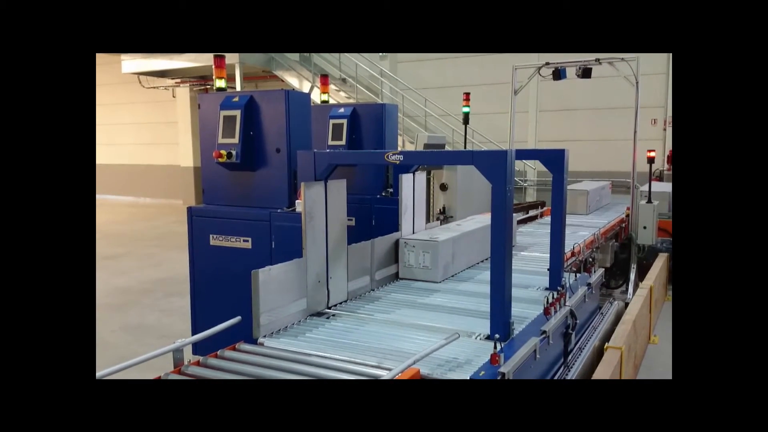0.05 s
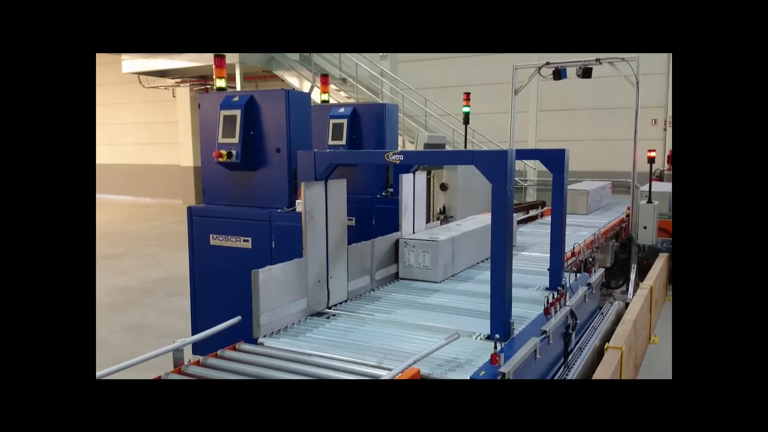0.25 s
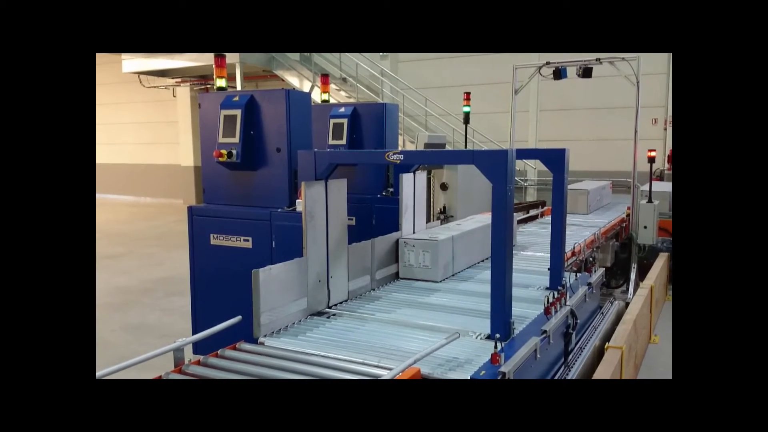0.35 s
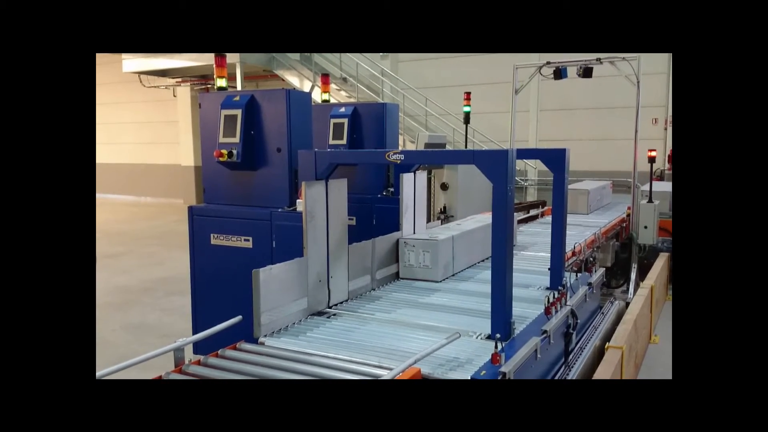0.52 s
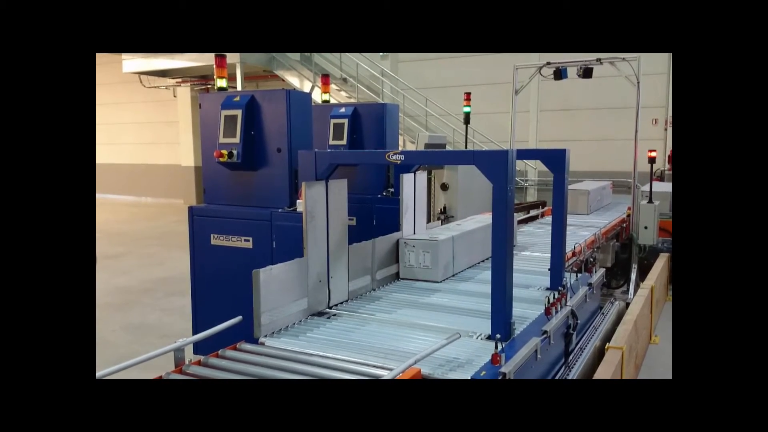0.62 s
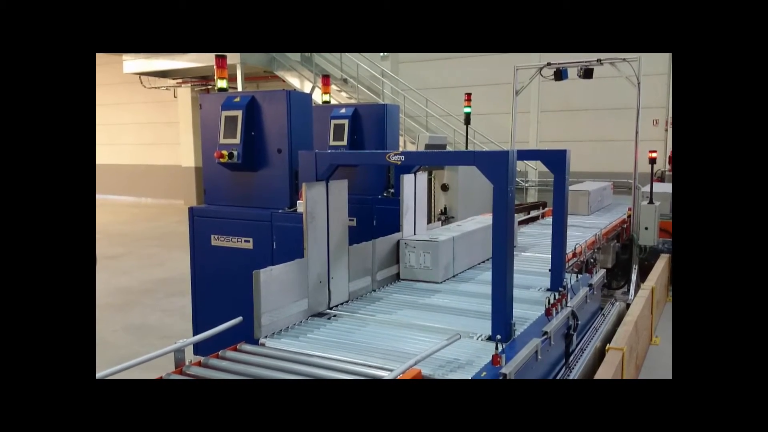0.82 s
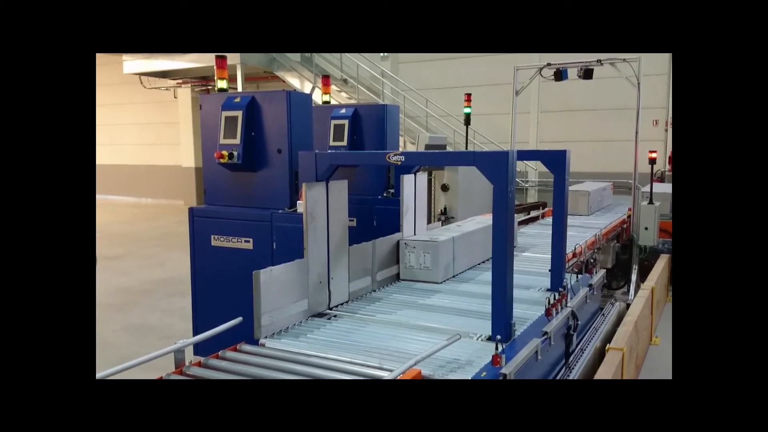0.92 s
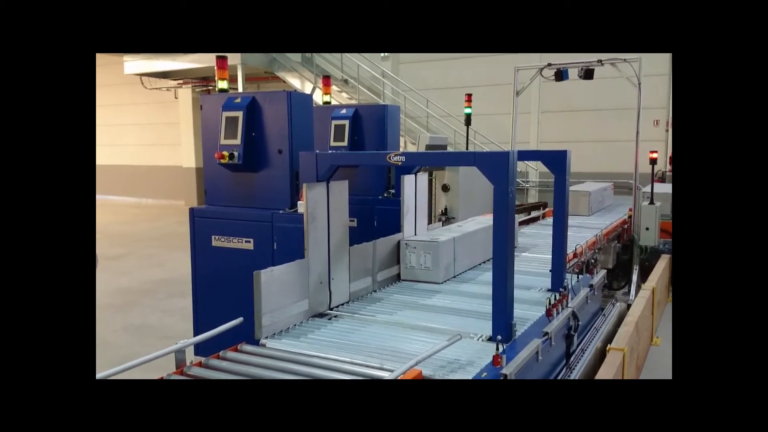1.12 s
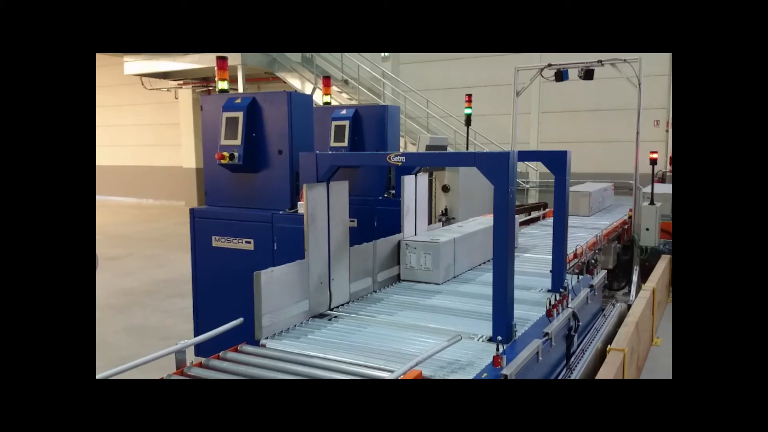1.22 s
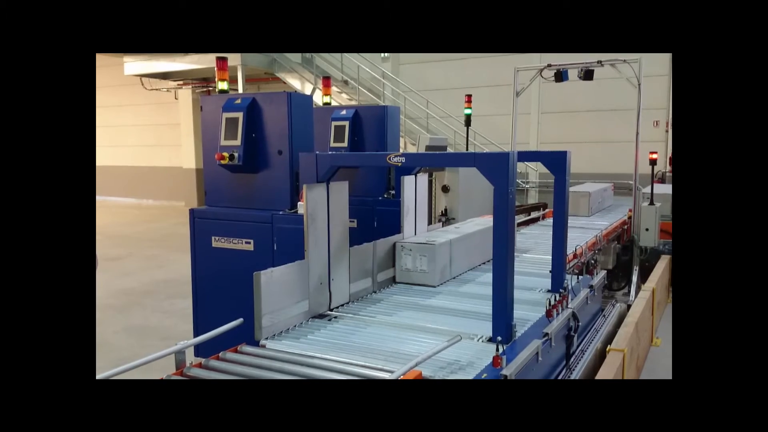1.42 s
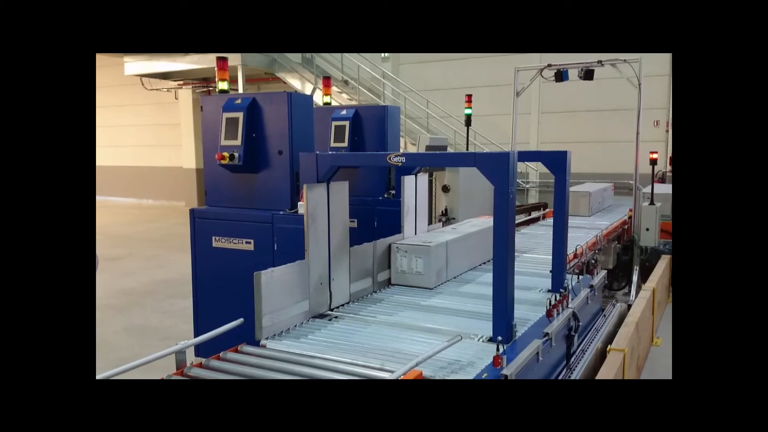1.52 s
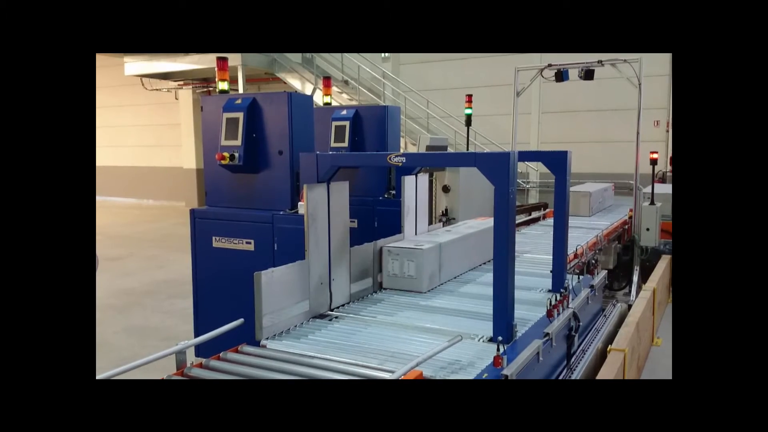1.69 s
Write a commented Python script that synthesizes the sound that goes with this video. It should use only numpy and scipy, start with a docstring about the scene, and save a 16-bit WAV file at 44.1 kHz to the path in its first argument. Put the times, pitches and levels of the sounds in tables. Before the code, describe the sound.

Automatic strapping machine whirs, shoots plastic strap, slams and clacks over conveyor rumble in a hall

```python
"""An automatic strapping machine in a factory hall, over a rumbling conveyor that runs throughout.
After two soft frame thumps, feed wheels spin up and shoot plastic strap round the arch: rubbing noise,
a stuttering harmonic whine and narrow-band squeaks, until the strap slams into its stop.
Grippers clack (gritty noise ringing steel modes), the frame thumps, a cylinder puffs.
Then a valve spits and vents hissing air, and the next feed starts; a diffuse echo rings on after each."""
import sys
import numpy as np
from scipy import signal
from scipy.fft import rfft, irfft
from scipy.io import wavfile
from scipy.ndimage import uniform_filter1d

SR = 44100
rng = np.random.default_rng(int(sys.argv[2]) if len(sys.argv) > 2 else 0)


def materialize(psi):
    """Save the field psi as 16-bit PCM at rate SR to the path in sys.argv[1].

    A 1-D psi becomes a single channel; in a 2-D psi each row is a channel.
    """
    bounded = np.clip(np.atleast_2d(psi).T, -1, 1)
    quanta = np.round(bounded * 32767).astype(np.int16)
    wavfile.write(sys.argv[1], SR, quanta)


N = 77175
T, F = np.arange(N) / SR, np.maximum(np.fft.rfftfreq(2 * N, 1 / SR), 1)

WHINE_HZ, IDLE_SHARE = 1990.3, .68  # pitch at full speed; starting speed as a share of it
WHINE_GRIP = .48  # share of the spin-up at which the whine sets in
WHINE_WANDER, WHINE_ROUGH = .014, .019  # slow and fast pitch deviation, share of the pitch
WHINE_STUTTER_DB, WHINE_SURGE_DB = 3.0, 3.0  # rms depths, quick and slower
RUB_DB, RUB_FLUTTER_DB = -36, 1.5
SPEED_DB = -2  # rubbing level change from rest to full speed
SLOW_DULL_HZ = 6200  # slow strap rubs without the treble above this
SQUEAK_WIDTH = 0.048  # share of the pitch
CLACK_ATTACK_SHARE, CLACK_GRIT = 0.162, 0.41  # attack as a share of the hold; depth of the chatter
STEEL_DB = -12  # ring relative to the clacks
THUMP_LEAD_S, RING_WIDTH_OCT = 0.000188, .45  # left leads; half-width of equal ring and burst power
VALVE_S, VENT_S, VENT_RELEASE_S, VENT_DB = 1.269, 0.233, 0.07, -43
SPIT_DB, SPIT_DECAY_S = -37.5, 0.0256
PUFF_S, PUFF_HOLD_S, PUFF_DB = .783, 0.0158, -37.5
HALL_DB, HALL_BUILD_S, HALL_SPLIT_HZ = -3.5, 0.0074, 495
ROLLER_FLUTTER_DB = 1.5
TOP_HZ = 15700


def undb(db):
    """Decibels to gain."""
    return 10 ** (np.asarray(db) / 20)


def unit(x):
    """Scale to rms 1."""
    return x / np.sqrt(np.mean(x ** 2))


def at(points, hz=F):
    """Read (Hz, value) points on a log-frequency axis."""
    p = np.array(points, float)
    return np.interp(np.log(hz), np.log(p[:, 0]), p[:, 1])


def shape(x, gain):
    """Filter with a gain for each frequency."""
    return irfft(rfft(x, 2 * N) * gain)[..., :N]


def walk(rate):
    """Smoothed random motion of rms 1, from rate random steps per second."""
    k = max(int(SR / rate), 1)
    steps = np.repeat(rng.standard_normal(N // k + 1), k)
    return unit(uniform_filter1d(steps, k)[:N])


def noise(db, lead=0):
    """Stereo noise of rms 1 with colour db and frequency-dependent correlation; left leads by lead seconds."""
    # Left-right correlation. Each row: frequency in Hz, likeness 0-1.
    likeness = [(200, 0.78), (700, 0.92), (1400, 0.09), (2800, 0.63), (5500, 0), (13000, 0.11)]
    mid, side = rfft(rng.standard_normal((2, N)), 2 * N)
    c = np.clip(at(likeness), 0, 1)
    mid, side = mid * np.sqrt(1 + c), side * np.sqrt(1 - c)
    left = mid + side
    right = (mid - side) * np.exp(-2j * np.pi * F * lead)
    return unit(irfft(np.array([left, right]) * undb(db))[:, :N])


def band(hz, width):
    """Stereo noise in one narrow resonance."""
    return noise(-20 * np.log10(1 + ((F - hz) / width) ** 4))


def pan(db):
    """Left and right gains; positive leans left."""
    return undb(np.array([[db], [-db]]) / 2)


def envelope(start, attack, hold, decay):
    """Linear rise, then exponential fall from hold after the start; all in seconds."""
    return np.clip((T - start) / attack, 0, 1) * np.exp(-np.maximum(T - start - hold, 0) / decay)


def feed():
    """Wheels spin up: the strap's rubbing brightens with speed, and once fast it sings a stuttering whine."""
    # Strap feeds. Each row: start in s, stop in s, rubbing gain in dB, whine gain in dB, pitch ratio.
    feeds = [(0.115, 0.478, 1.5, -3.5, 1.0), (1.634, 1.9, -5, -15.5, 1.07)]
    # Wheel spin-up per feed. Each row: time of fastest rise in s, rise time in s.
    spin_ups = [(.238, .037), (1.70, .014)]
    # Whine harmonics. Each row: multiple, level before feed gain in dB, rms phase jitter in radians.
    harmonics = [(1, -42, 0.43), (2, -35.5, 0.477), (3, -36.5, 1.48), (4, -36.5, 1.02)]
    # Colour of strap rubbing along its track. Each row: frequency in Hz, relative density in dB per Hz.
    rub_colour = [(300, -28), (1000, -17.5), (1900, -4), (2700, -12), (3800, -0.5), (4700, -2.5), (6100, 1),
                  (8800, -9.5), (11000, -10.5), (13000, -4.5), (15500, -21)]
    out = 0
    for (start, stop, rub_db, whine_db, ratio), (middle, rise) in zip(feeds, spin_ups):
        spin = .5 + .5 * np.tanh((T - middle) / rise / 2)
        hz = WHINE_HZ * ratio * (IDLE_SHARE + (1 - IDLE_SHARE) * spin)
        hz = hz * (1 + WHINE_WANDER * walk(60) + WHINE_ROUGH * walk(1500))
        phase = 2 * np.pi * np.cumsum(hz) / SR
        stutter_db = WHINE_STUTTER_DB * walk(130) + WHINE_SURGE_DB * walk(44.5)
        whine = np.zeros((2, N))
        for channel in whine:  # independent jitter left and right
            for multiple, db, jitter in harmonics:
                tone = np.sin(multiple * phase + jitter * walk(400))
                channel += undb(db) * unit(tone * undb(stutter_db + walk(150)))
        singing = .5 + .5 * np.tanh((spin - WHINE_GRIP) / .15)
        rub = noise(at(rub_colour)) * undb(RUB_DB + RUB_FLUTTER_DB * walk(400) + SPEED_DB * (spin - 1))
        dull_rub = shape(rub, 1 / (1 + (F / SLOW_DULL_HZ) ** 4))
        rub = spin * rub + (1 - spin) * dull_rub
        strap = whine * singing * undb(whine_db) + rub * undb(rub_db)
        out = out + strap * envelope(start, 0.0563, stop - start, 0.0044)
    return out


def squeaks():
    """The strap catches briefly in its guides: short bursts of narrow-band noise."""
    # Each row: start in s, pitch in Hz, level in dB, hold in s.
    catches = [(0.241, 3337, -39, 0.0135), (0.326, 4040, -30.5, 0.0042), (0.419, 4020, -30.5, 0.005),
               (1.667, 2164, -43, 0.0162), (1.73, 2164, -46.5, .025)]
    out = 0
    for start, hz, db, hold in catches:
        out = out + band(hz, hz * SQUEAK_WIDTH) * undb(db) * envelope(start, 0.00264, hold, 0.0065)
    return out


def clacks():
    """Strap, grippers and cutter clack: brief gritty noise, each with its own tilt, ringing steel modes."""
    # Each row: start in s, level in dB, hold in s, decay in s, tilt in dB per octave, pan in dB,
    # top treble in dB.
    blows = [(0.103, -40, 0.0273, 0.0043, -1, 0, -7.5), (0.437, -25, 0.0023, 0.0095, 0, 2, 4),
             (0.453, -27.5, 0.0153, 0.0093, 2, -8, -2.5), (0.4729, -15.5, 0.0085, 0.0056, -0.0544, 2, 3.5),
             (0.486, -26, 0.00977, 0.0121, -1.62, 2.5, 2.5), (0.719, -29.5, 0.0157, 0.0336, 1, -2.5, -10.5),
             (0.776, -34, 0.00785, 0.0242, -0.06, 2.5, -5), (0.876, -41, 0.019, 0.0137, -3.5, 4, -9),
             (0.955, -41.5, 0.0244, 0.0308, -2, 1.5, -8), (1.319, -35.5, 0.0038, 0.00294, 0, -2.5, -3),
             (1.327, -24, 0.00682, 0.01122, 0.51, 2, -3.5),
             (1.582, -33.5, 0.00635, 0.0331, 0.34, 0.5, -22.5)]
    # Colour of a clack's body. Each row: frequency in Hz, relative density in dB per Hz.
    body_colour = [(30, -34), (150, -17.5), (500, -6.5), (900, -4), (1400, -5.5), (2000, -1), (2700, -5.5),
                   (3800, -1.5), (4700, -0.5), (6400, 1), (8000, -6), (10000, -15), (11800, -15.5),
                   (13200, -9.5), (15500, -27.5)]
    # Modes of steel parts. Each row: frequency in Hz, relative level in dB, t60 in s.
    steel = [(558.3, -1, 0.0258), (789, -2, 0.038), (1390.2, -1, 0.175), (1938, -18.5, 0.21),
             (2168, -1.5, 0.031), (3130, -22.5, 0.064), (3515, -8.5, 0.054), (3845, -9.5, 0.034),
             (4675, 0, 0.048), (6038, 1, 0.051), (6697, -1.5, 0.0215), (8045, -4.5, 0.034),
             (14040, 6.5, 0.041)]
    out = 0
    treble = np.clip((F - 6300) / 2500, 0, 1)
    for start, db, hold, decay, tilt, pan_db, treble_db in blows:
        colour = at(body_colour) + tilt * np.log2(np.maximum(F, 400) / 3000) + treble_db * treble
        grit = unit(np.exp(CLACK_GRIT * walk(1500) / 2))
        burst = noise(colour) * grit * envelope(start, CLACK_ATTACK_SHARE * hold, hold, decay)
        out = out + burst * undb(db) * pan(pan_db)
    modes = 0
    for hz, db, t60 in steel:
        modes = modes + undb(db) * np.sin(2 * np.pi * hz * T) * undb(-60 * T / t60)
    ring = shape(out, rfft(modes, 2 * N))
    return out + unit(ring) * out.std() * undb(STEEL_DB)


def thumps():
    """Parts land on damped frame panels: a mode rings in a dull burst; narrow thumps ring more."""
    # Each row: start in s, level in dB, pitch in Hz, half-width in octaves, decay in s, pan in dB.
    landings = [(.002, -44.5, 333.7, 0.502, 0.034, 1), (.056, -43, 328, 0.76, 0.014, 4),
                (0.434, -37.5, 1061, 0.55, 0.005, 4), (0.474, -43.5, 69.4, 0.87, 0.0131, -6),
                (0.474, -32.5, 542.6, 0.15, 0.0091, 5), (.476, -39, 270, 0.546, 0.0051, 2.5),
                (0.475, -43, 796, 0.22, 0.011, -4.5), (0.494, -31.5, 808.8, 0.284, 0.0055, -1.5),
                (.545, -42.5, 301.5, 0.593, 0.047, 6.5), (.711, -32, 500, 0.428, 0.0153, 6),
                (.733, -40, 227.1, 0.478, 0.037, 6.5), (0.81, -35, 257.6, 0.372, 0.0138, 5.5),
                (.812, -39, 524.5, 0.399, 0.0233, 5), (0.924, -40.5, 418.8, 0.55, 0.0142, 6),
                (.992, -42, 303.2, 0.255, 0.0097, 5), (1.466, -44.5, 338.4, 0.575, 0.0109, 5),
                (1.623, -40.5, 246.4, 0.9, 0.08, 4.5)]
    out = 0
    for start, db, hz, width, decay, pan_db in landings:
        burst = noise(-20 * np.log10(1 + (np.log2(F / hz) / width) ** 4), THUMP_LEAD_S)
        ring = unit(np.sin(2 * np.pi * hz * (T - start)))
        share = 1 / (1 + (width / RING_WIDTH_OCT) ** 4)  # ring's share of the power
        thump = np.sqrt(share) * ring + np.sqrt(1 - share) * burst
        out = out + thump * envelope(start, 0.00272, 0.00454, decay) * undb(db) * pan(pan_db)
    return out


def valve():
    """A gripper's cylinder puffs; later compressed air spits out, hisses on and dies away."""
    # Colour of venting air. Each row: frequency in Hz, relative density in dB per Hz.
    vent_colour = [(300, -7), (1000, -2.5), (3500, -3), (6200, 2), (9500, -9.5), (13000, -6.5),
                   (15500, -16.5)]
    # Colour of the opening spit. Each row: frequency in Hz, relative density in dB per Hz.
    spit_colour = [(2000, -36.5), (4000, -20), (6000, 3.5), (8200, 2), (9400, 2.5), (11000, -23),
                   (15500, -12.5)]
    puff = undb(PUFF_DB) * envelope(PUFF_S, 0.0041, PUFF_HOLD_S, 0.0241)
    spit = noise(at(spit_colour)) * undb(SPIT_DB) * envelope(VALVE_S, 0.00134, 0.00385, SPIT_DECAY_S)
    vent = undb(VENT_DB) * envelope(VALVE_S, 0.00573, VENT_S, VENT_RELEASE_S)
    flutter = undb(walk(59.64))
    return spit + noise(at(vent_colour)) * flutter * (vent + puff)


def hall(x):
    """Diffuse echo that builds up, then fades, lasting longest in the mids; bass alike on both sides."""
    # Decay. Each row: frequency in Hz, t60 in s.
    hall_t60 = [(100, 0.02), (1000, 2.5), (2700, 3), (4700, 1.1242), (8500, 0.9323), (15000, 0.57)]
    # Colour. Each row: frequency in Hz, gain in dB.
    hall_colour = [(100, 0.5), (400, -4.5), (900, -1.5), (2000, -6.5), (4000, -3.5), (6000, -1.5),
                   (9000, -4.5), (14000, -9.5)]
    centres = np.geomspace(60, 16000, 10)
    hiss, tail = rfft(rng.standard_normal((2, N)), 2 * N), 0
    apart = np.pi / 4 / (1 + (HALL_SPLIT_HZ / F) ** 2)
    hiss = hiss[0] * np.cos(apart) + hiss[1] * np.sin(apart) * np.array([[1], [-1]])
    for hz, weights in zip(centres, np.eye(len(centres))):  # overlapping triangular bands
        window = np.interp(np.log(F), np.log(centres), weights)
        part = irfft(hiss * window * undb(at(hall_colour)))[:, :N]
        tail = tail + part * np.exp(-np.log(1000) * T / at(hall_t60, hz))
    tail = tail * (1 - np.exp(-T / HALL_BUILD_S)) / np.sqrt(SR / 10)
    return shape(x, rfft(tail, 2 * N)) * undb(HALL_DB)


def conveyor():
    """Rollers run unevenly over a deep rumble; motors hum and their drive whistles in narrow noise bands."""
    # Roller colour. Each row: frequency in Hz, relative density in dB per Hz.
    roller_colour = [(25, -26), (140, -13), (200, 1.5), (330, -0.5), (600, 0), (900, -1.5), (1200, -4),
                     (2200, -8), (3600, -13), (5500, -27), (9000, -30.5), (15000, -44.5)]
    # Roller level before panning. Each row: time in s, level in dB.
    roller_db = [(0, -48), (.17, -45), (.33, -51), (.9, -46), (1.2, -52), (1.75, -43.5)]
    # Rumble colour. Each row: frequency in Hz, relative density in dB per Hz.
    rumble_colour = [(20, -2), (60, -3.5), (110, 1), (170, -9.5), (400, -19.5), (2000, -58.5)]
    # Rumble level before panning. Each row: time in s, level in dB.
    rumble_db = [(0, -69.5), (.35, -68.5), (.55, -61.5), (1.0, -59.5), (1.2, -53.5), (1.45, -63),
                 (1.75, -57.5)]
    # Motor hums and drive whistle. Each row: frequency in Hz, width in Hz, level before panning in dB.
    motors = [(338.5, 10.5, -60.5), (195, 15.2, -63), (11983, 119, -71)]
    level_db = np.interp(T, *np.array(roller_db).T) + ROLLER_FLUTTER_DB * walk(35.67)
    rollers = noise(at(roller_colour), lead=0.000199) * undb(level_db)
    rumble = noise(at(rumble_colour)) * undb(np.interp(T, *np.array(rumble_db).T))
    hum = sum(undb(db) * band(hz, width) for hz, width, db in motors)
    return (rollers + hum) * pan(3.3) + rumble * pan(-1.57)


def scene():
    """The machine and its echo over the conveyor; deep bass leans left, treble right."""
    # Left-right balance. Each row: frequency in Hz, left over right in dB.
    balance_db = [(60, 3.5), (300, -0.5), (1400, 2), (3000, 1.5), (6000, -1), (9000, -9), (13000, -5)]
    machine = feed() + squeaks() + clacks() + thumps() + valve()
    mix = machine + hall(machine) + conveyor()
    return shape(mix, undb(np.array([at(balance_db), -at(balance_db)]) / 2))


def record(dry):
    """Steep elliptic low-pass at TOP_HZ."""
    return signal.sosfilt(signal.ellip(10, .2, 80, TOP_HZ, fs=SR, output="sos"), dry)


dry = scene()
out = record(dry)
materialize(out)
```